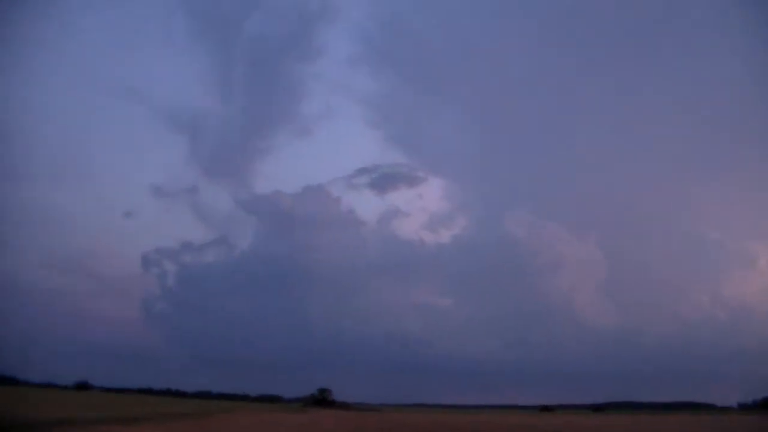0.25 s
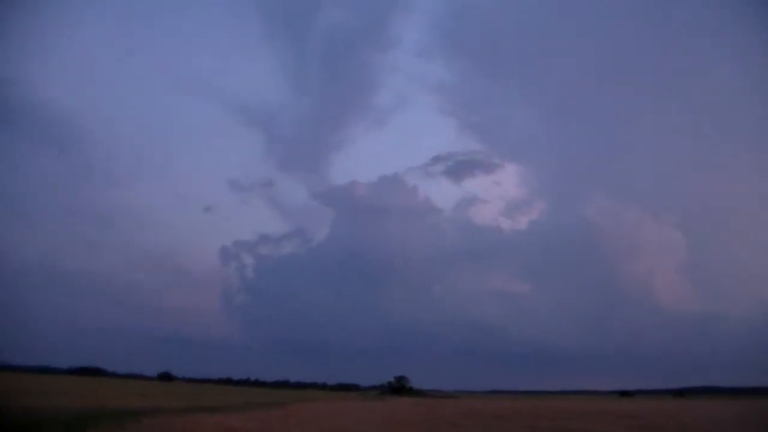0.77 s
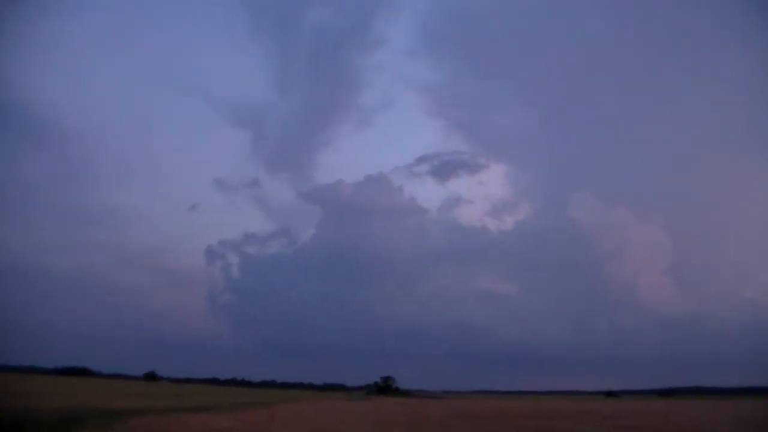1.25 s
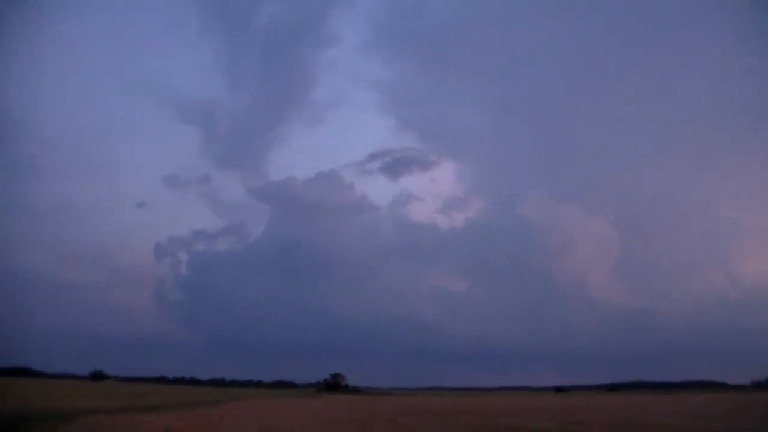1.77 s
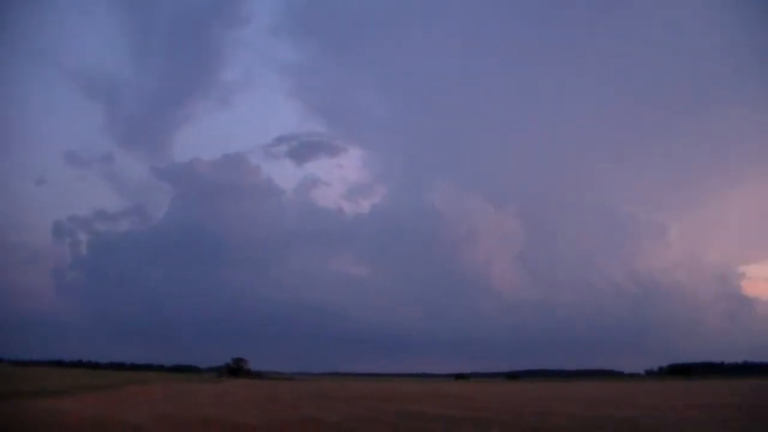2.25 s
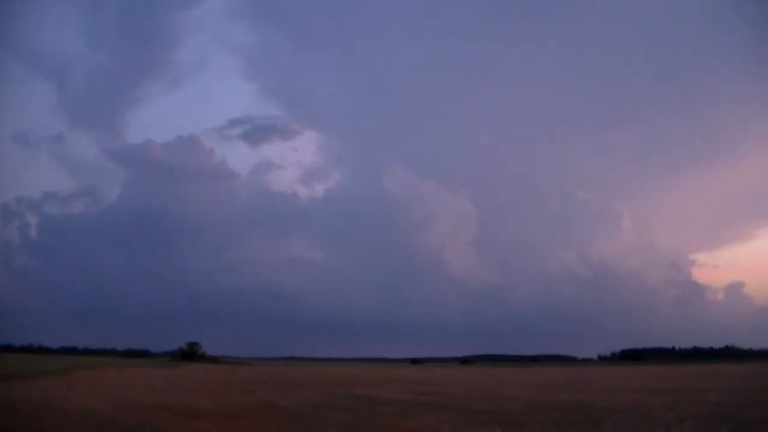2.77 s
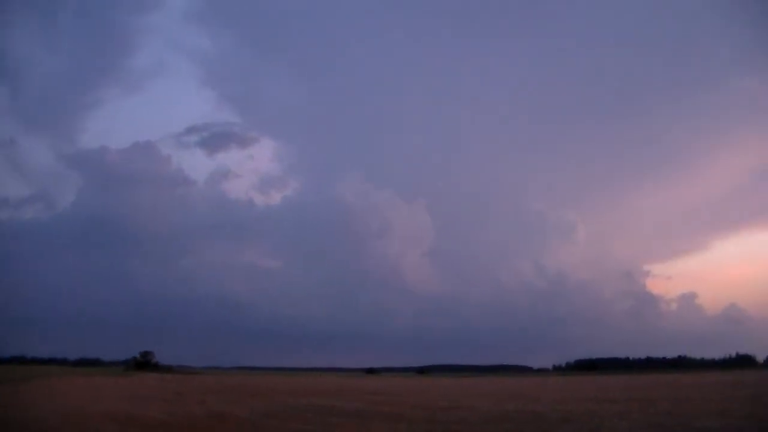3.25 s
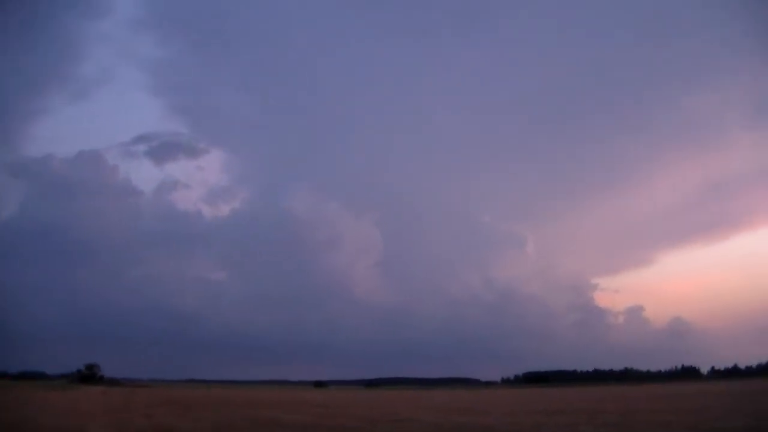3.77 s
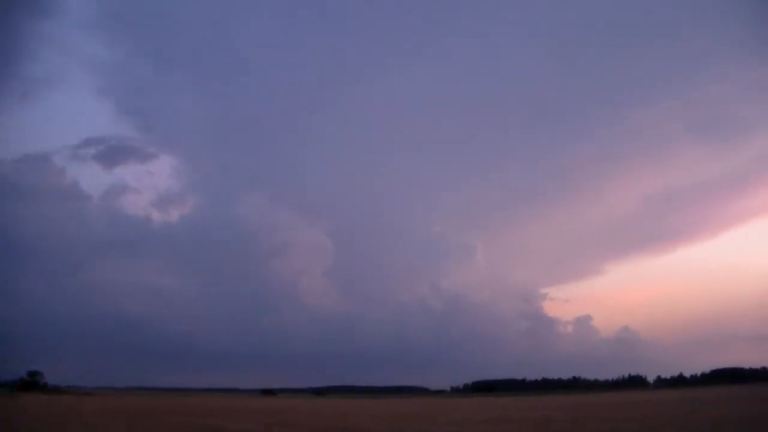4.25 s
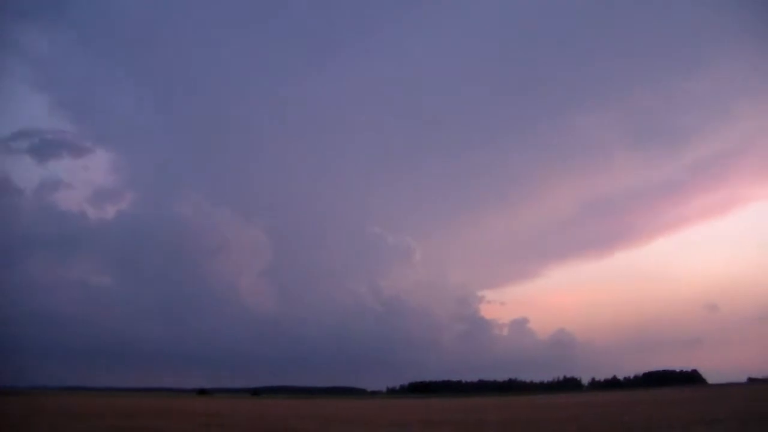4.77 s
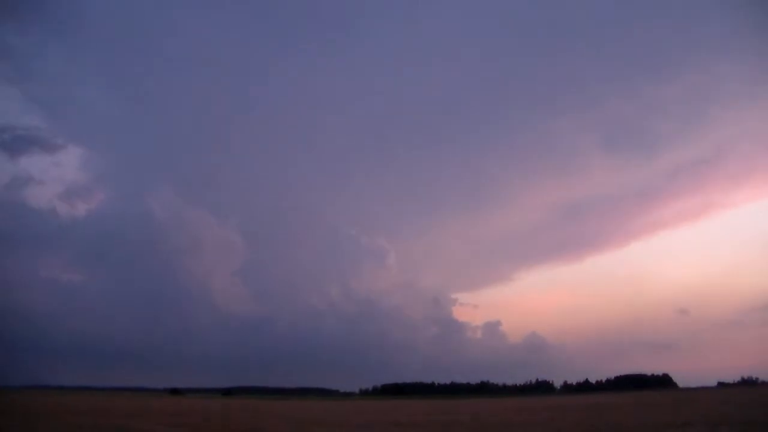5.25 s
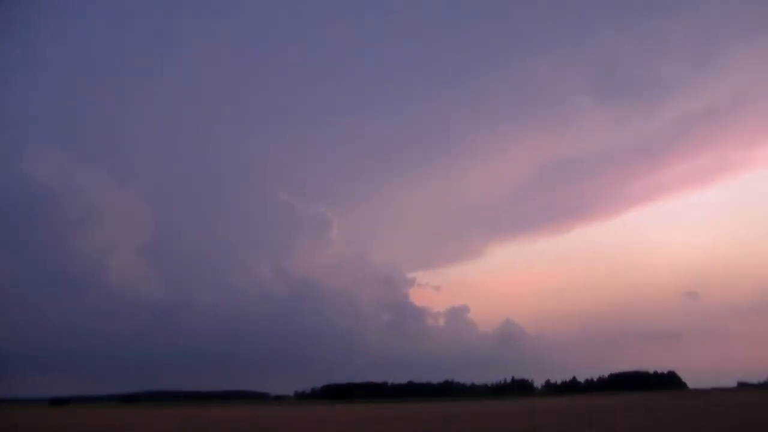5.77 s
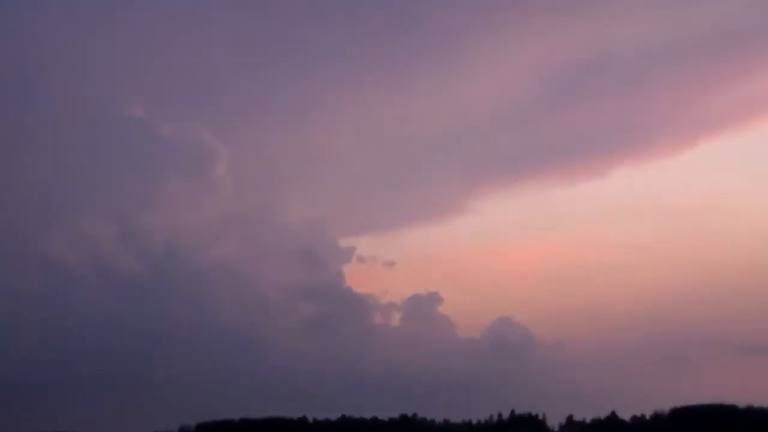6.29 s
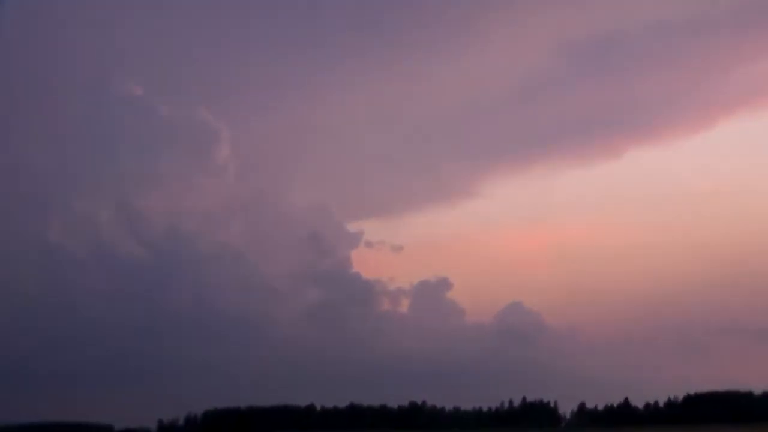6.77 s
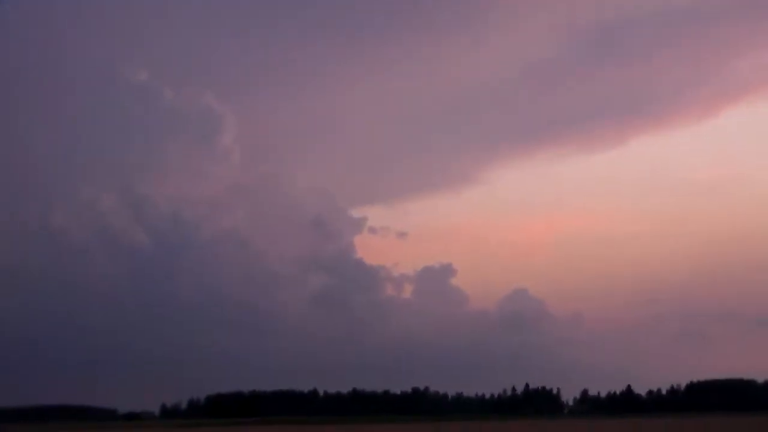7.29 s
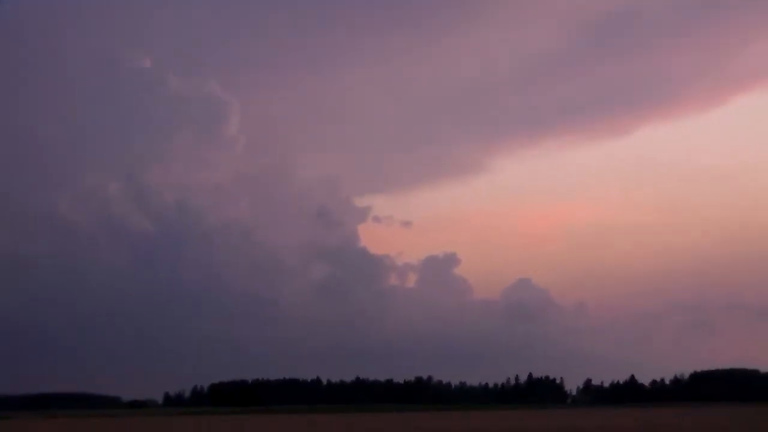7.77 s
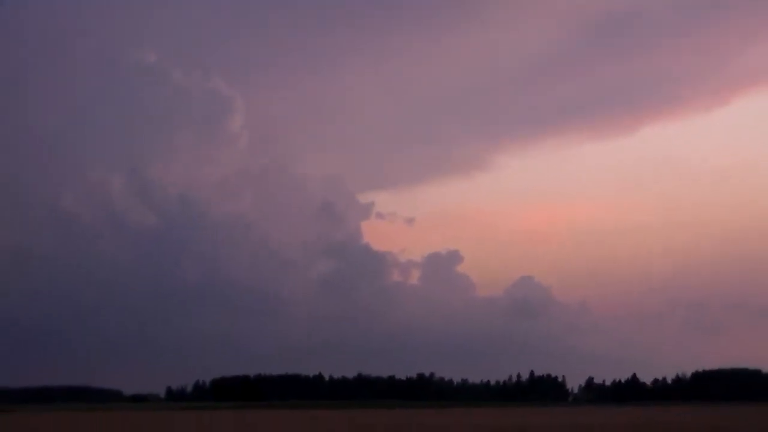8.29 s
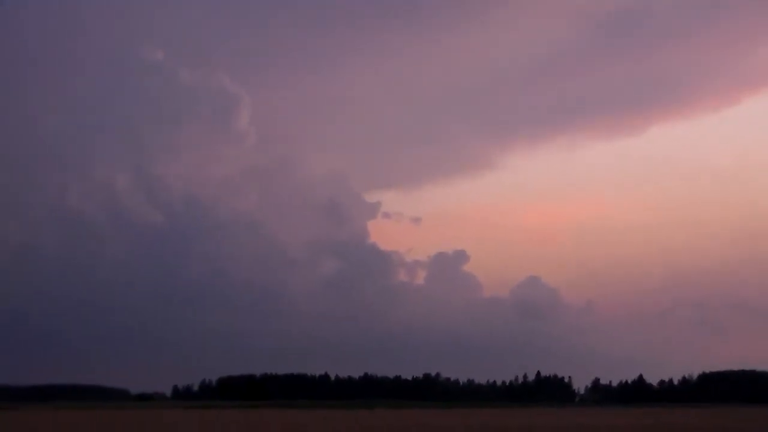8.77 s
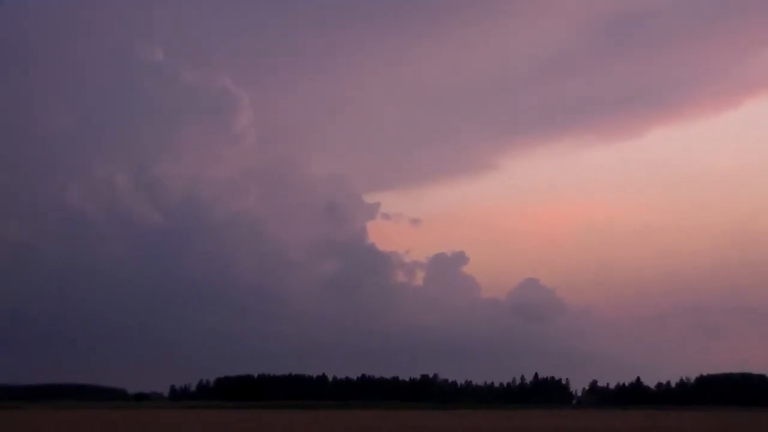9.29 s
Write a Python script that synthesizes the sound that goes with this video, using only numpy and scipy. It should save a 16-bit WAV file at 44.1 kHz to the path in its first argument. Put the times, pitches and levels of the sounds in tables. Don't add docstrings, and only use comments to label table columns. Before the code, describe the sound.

A high, fast-pulsing cricket chorus, faint distant traffic and low wind thumps, interrupted midway by a sharp click and a brief stepping zoom motor.

```python
import sys
import numpy as np
from scipy import signal
from scipy.fft import rfft, irfft, next_fast_len
from scipy.io import wavfile
from scipy.ndimage import uniform_filter1d

SR = 44100
rng = np.random.default_rng(int(sys.argv[2]) if len(sys.argv) > 2 else 0)


def to_wav(sig):
    pcm = np.clip(np.atleast_2d(sig), -1, 1) * 32767
    pcm = np.round(pcm).astype(np.int16)
    wavfile.write(sys.argv[1], SR, pcm.T)


def voltage_ratio(decibels):
    exponent = np.asarray(decibels, float) / 20
    return 10 ** exponent


N = 420273
TIME = np.arange(N) / SR
SIZE = next_fast_len(N)
FREQ = np.arange(SIZE // 2 + 1) * SR / SIZE


def curves(rows):
    s, *columns = np.transpose(rows)
    return [np.interp(TIME, s, c) for c in columns]


def along(points):
    hz, value = np.transpose(points)
    return np.interp(np.log(FREQ + 1), np.log(hz + 1), value)


def unit(x):
    return x / np.sqrt(np.mean(x ** 2))


def colour(x, gain):
    return unit(irfft(rfft(x, SIZE) * gain, SIZE)[:N])


def pan(db):
    return voltage_ratio(np.array([db, -db]) / 2)


def walk(rate_hz):
    k = int(SR / rate_hz)
    held = np.repeat(rng.standard_normal(N // k + 1), k)
    return 1.2 * uniform_filter1d(uniform_filter1d(held, k), k)[:N]


def add(out, s, sound):
    i = int(s * SR)
    out[..., i:i + sound.shape[-1]] += sound


# time in seconds, level in dB.
TRAFFIC_DB = [
    (0, 5.5),
    (1.4, 1.5),
    (3.3, 2),
    (5.6, 0),
    (6, 0.5),
    (7.8, 3),
    (8.5, -.5),
    (9.53, 1.5),
]
# frequency in Hz, level in dB per Hz.
FIELD_SPECTRUM = [(120, -2), (200, -2), (244, -2), (479, -1.5), (536, -2), (617, -0.5), (830, -2),
                  (1100, -0.5), (1180, -3.5), (1910, -9.5), (5800, -13), (7540, -45), (12800, -120)]
# frequency in Hz, left-right correlation.
FIELD_CORRELATION = [(200, 0.41), (400, 0.5), (800, 0.81), (1600, 0.9), (3200, 0.1), (5500, 0.059)]


def field():
    level_db = -54.5 - 2.0
    alike = np.clip(along(FIELD_CORRELATION), -1, 1)
    mid, side = (irfft(rfft(rng.standard_normal(SIZE)) * voltage_ratio(along(FIELD_SPECTRUM)) * np.sqrt(1 + sign * alike),
                       SIZE)[:N] for sign in (1, -1))
    pair = np.array([mid + side, mid - side]) * pan(0.14)[:, None] / np.sqrt(np.mean(mid ** 2))
    return pair * voltage_ratio(level_db + curves(TRAFFIC_DB)[0] + 0.81 * walk(4.13) + 0.94 * walk(13))


# centre in seconds, length in seconds, peak in dB, left minus right in dB.
GUSTS = [(0.368, 0.068, -42, 9), (0.59, 0.19, -52, -5), (1.537, 0.7, -60.5, -1), (2.613, 0.1, -51.5, 15),
         (3.603, .1, -52, -12), (3.96, 0.15, -48, 14.5), (4.273, 0.2, -44, 0.5), (4.448, 0.061, -39, 11),
         (4.613, 0.067, -44.5, 10), (5.17, 0.076, -49.5, 10), (5.36, 0.15, -41, 1), (5.5, 0.12, -53, 10),
         (6.24, 0.22, -39, -4), (6.536, 0.14, -47, -7), (6.675, 0.072, -39, 8), (6.864, 0.11, -47, 7),
         (7.23, 0.35, -42, 11), (7.457, 0.36, -35, 0), (7.777, 0.18, -36.5, 8), (7.987, 0.1, -32.5, 5),
         (8.17, 0.13, -39.5, 17), (8.28, 0.27, -38, 9), (8.573, 0.069, -40.5, 8), (8.85, 0.23, -49, 13),
         (9.094, 0.64, -43.5, 3), (9.385, 0.2, -45.5, 10)]
# frequency in Hz, level in dB per Hz.
RUMBLE_SPECTRUM = [(10, -12), (17, 9), (30, -4.5), (45, 3.5), (60, -36)]
# frequency in Hz, level in dB per Hz.
BUFFET_SPECTRUM = [(26, -23), (45, 0.5), (75, 1.5), (106, -6), (191, -19.5), (301, -31), (400, -35.5),
                   (520, -60), (880, -120)]


def wind():
    calm_db, rumble_db, rumble_follows = -57, -49, 0.56
    centre, length, db, pan_db = np.transpose(GUSTS)[..., None]
    coarse = TIME[::64]
    power = voltage_ratio(2 * db) * np.exp(-(2 * (coarse - centre) / length) ** 2)
    total = power.sum(0) + voltage_ratio(2 * calm_db)
    gust = np.interp(TIME, coarse, np.sqrt(total))
    side_db = np.interp(TIME, coarse, (power * pan_db).sum(0) / total)
    deep = [voltage_ratio(2.2 * walk(4.4)) * colour(rng.standard_normal(N), voltage_ratio(along(RUMBLE_SPECTRUM))) for _ in range(2)]
    buffet = [unit(voltage_ratio(2.03 * walk(22)) * colour(rng.standard_normal(N), voltage_ratio(along(BUFFET_SPECTRUM))))
              for _ in range(2)]
    rumble_gain = voltage_ratio(rumble_db) * (gust / voltage_ratio(calm_db)) ** rumble_follows
    out = np.array(deep) * rumble_gain * pan(1.5)[:, None] + np.array(buffet) * gust * pan(side_db)
    return signal.sosfilt(signal.butter(4, 400, fs=SR, output="sos"), out)


# time in seconds, peak in dB, width in ms, push +1 or pull -1.
WINDWARD_EDDIES = [(4.2002, -30, 4.5, -1), (4.2838, -33, 3.3, -1), (4.3082, -34, 6.1, 1),
                   (4.3391, -30, 5.9, -1), (4.4389, -26.5, 3.9, -1), (4.4611, -25, 1.42, -1),
                   (4.488, -38, 2.6, 1), (5.5055, -32.5, 4.7, -1), (6.5516, -25.5, 4.9, 1),
                   (6.86, -27, 5.5, -1), (7.1469, -27, 3.4, 1), (7.259, -24.5, 2.26, 1),
                   (7.2868, -21.5, 3.6, 1), (7.3362, -24, 4.2, -1), (7.3812, -23.5, 2.6, 1),
                   (7.5643, -25.5, 3.5, -1), (7.7512, -25.5, 2.66, 1), (7.7935, -23.5, 2.43, 1),
                   (7.8415, -30, 6.8, -1), (7.9224, -35, 12, 1), (7.9473, -27, 3.4, -1),
                   (7.9733, -21.5, 2.4, -1), (8.004, -17.5, 4.8, -1), (8.171, -25, 4, 1),
                   (8.1976, -30, 11, 1), (8.3865, -22.5, 4.2, -1)]
# time in seconds, peak in dB, width in ms, push +1 or pull -1.
SHELTERED_EDDIES = [
    (4.356, -29.5, 4.1, -1),
    (4.48, -35, 4.5, -1),
    (7.3463, -36, 5.9, -1),
    (7.3868, -27, 3.7, -1),
    (7.4406, -23, 4.7, 1),
    (7.4627, -29.5, 2.2, -1),
    (7.777, -24, 6.3, -1),
    (8.0129, -32, 5, -1),
]


def eddies():
    out = np.zeros((2, N))
    half = SR // 20
    for port, bursts in enumerate((WINDWARD_EDDIES, SHELTERED_EDDIES)):
        for s, db, ms, push in bursts:
            u = np.arange(-half, half) / SR / (ms / 1300)
            lump = (1 - u ** 2) * np.exp(-u ** 2 / 2)
            add(out[port], s - half / SR, np.sign(push) * voltage_ratio(db + 3.0) * lump)
    return out


def ring(modes, push_ms):
    t = np.arange(SR // 20) / SR
    y = sum(voltage_ratio(db) * np.sin(2 * np.pi * hz * t) * np.exp(-np.log(1000) * t / t60) for hz, db, t60 in modes)
    y = y * (1 - np.exp(-t * 1000 / push_ms))
    return y / np.abs(y).max()


def hit(out, s, db, modes, push_ms, spread):
    modes = 3 * list(modes)
    nudges = rng.standard_normal((2, len(modes), 2))
    mid, side = (ring([(hz * (1 + spread * a), g + b, t60) for (hz, g, t60), (a, b) in zip(modes, nudge)], push_ms)
                 for nudge in nudges)
    add(out, s, voltage_ratio(db) * (mid + voltage_ratio(-9) * side * np.array([[1], [-1]])))


# time in seconds, peak in dB, ring in Hz.
CASING_TICKS = [(0.135, -52.5, 2490), (0.395, -57, 1650), (0.4223, -55, 1800), (0.4582, -53.5, 1840),
                (0.6392, -56, 1600), (2.616, -56, 2800), (5.5235, -51, 2400), (6.575, -52, 4080),
                (6.7748, -58, 2590), (8.2153, -51, 2300), (9.015, -52.5, 2800)]


def casing_ticks(out):
    for s, db, hz in CASING_TICKS:
        modes = [(hz, 0, .007), (0.655 * hz, -2, .006),
                 (min(1.14 * hz, 4400), -3, .006), (min(1.39 * hz, 5000), -8, .005)]
        hit(out, s, db + 18.5, modes, 0.54, 0.19)


# frequency in Hz, level in dB, t60 in seconds.
PRESS_MODES = [(1050, -12, 0.03), (1600, -4, 0.014), (2000, -1, .014), (2250, 6, 0.022), (2700, 3, 0.018),
               (3140, -2, .014), (4800, -10, .008), (5922, -11, .006)]
# time in seconds, peak in dB, push in ms.
SNAP_HITS = [
    (5.640, -32, .8),
    (5.6440, -15, .1),
    (5.6448, -15, .2),
    (5.6455, -3, .06),
    (5.6463, -11, .1),
    (5.6475, -17, .3),
    (5.6490, -17, .5),
    (5.6511, -17, .5),
    (5.6535, -22, .5),
]
# frequency in Hz, level in dB, t60 in seconds.
SWITCH_MODES = [(1400, -22, 0.013), (2190, -10, 0.0099), (3120, 2, 0.011), (4200, 2, 0.008),
                (5200, 0, 0.005), (6370, 4, 0.006), (7400, 0, 0.005), (9000, 3, 0.006), (10300, 1, 0.004),
                (12500, -3, .002)]


def switch(out):
    hit(out, 5.5729, -13.5, PRESS_MODES, 0.1, 0.05)
    for s, db, push_ms in SNAP_HITS:
        hit(out, s, db, SWITCH_MODES, push_ms, 0.06)


MOTOR_S, STOP_S = 5.6965, 6.497
# frequency in Hz, level in dB, t60 in seconds.
BARREL_MODES = [(1114, 5, 0.031), (996, -0.5, 0.031)]
# frequency in Hz, level in dB, t60 in seconds.
GEAR_MODES = [(1660, 0, 0.013), (2140, -4, 0.017), (2800, -2, 0.017), (3390, -2, 0.019), (3880, -13, 0.011)]


def lens_motor(out):
    step_s, step_count, step_scatter_db = .03714, 22, .7
    jerk_db, slack_db, loaded_db, stop_db = -37, -51, -31, -29
    load_from_s, load_to_s = 5.83, 6.23
    gear_db, soft_teeth_s, soft_db = -3, (6.253, 6.365), -14
    slip_s, slip_db = 6.4, -8
    times = np.append(MOTOR_S + step_s * np.arange(step_count), STOP_S)
    load_db = np.interp(times, [load_from_s, load_to_s], [slack_db, loaded_db])
    load_db = load_db + step_scatter_db * rng.standard_normal(len(times))
    for s, db in zip(times, [jerk_db, *load_db[1:-1], stop_db]):
        slips = abs(s - slip_s) < step_s / 2
        soft = any(abs(s - tooth) < step_s / 2 for tooth in soft_teeth_s)
        hit(out, s, db + slip_db * slips, BARREL_MODES, 1.8, 0.0094)
        hit(out, s, db + gear_db + soft_db * soft, GEAR_MODES, 0.27, 0.074)


def motor_whirr():
    whirr_db, scrape_db, scrape_s = -55, -40.5, .006
    spectrum = [(500, -12.5), (1000, -8), (1400, -16), (3800, -11), (5000, -23), (9000, -70)]  # Hz, dB
    running = (TIME > MOTOR_S) * (TIME < STOP_S + scrape_s)
    scrape = np.exp(-((TIME - STOP_S - .009) / scrape_s) ** 2)
    noise = colour(rng.standard_normal(N), voltage_ratio(along(spectrum)))
    return noise * (voltage_ratio(whirr_db) * running + voltage_ratio(scrape_db) * scrape)


def camera():
    out = np.zeros((2, N))
    casing_ticks(out)
    switch(out)
    lens_motor(out)
    out = signal.sosfilt(signal.butter(2, 600, "high", fs=SR, output="sos"), out)
    return out + motor_whirr()


def stroke_shape(turns):
    lean_rad = -0.39
    angle = 2 * np.pi * turns
    return np.cos(angle + lean_rad * (np.cos(angle) - 1))


def teeth(rate_hz, scatter_db):
    moment, size, sign = rng.random(N), rng.exponential(size=N), rng.standard_normal(N)
    return unit((moment < rate_hz / SR) * voltage_ratio(scatter_db * size) * np.sign(sign))


# time in seconds, lags of first and second in wing strokes.
SINGER_LAGS = [(0.0, 0.33, 1.13), (0.66, -0.27, 0.65), (1.3, -0.11, 0.49), (1.8, -0.55, 0.57),
               (2.09, -0.55, 0.12), (2.98, -0.64, 0.2), (3.54, -1.05, -0.43), (3.81, -0.8, -0.45),
               (4.45, -0.43, -0.36), (5.02, -0.67, -0.42), (5.62, -0.55, -0.57), (6.03, -0.81, -0.78),
               (6.55, -0.8, -0.42), (7.15, -1.15, -1.0), (7.81, -1.22, -0.53), (8.47, -1.44, -0.75),
               (9.2, -1.71, -1.03), (9.53, -1.71, -1.06)]
WING_PEAKS_HZ = (7940, 10950)
# time in seconds, level in dB, left minus right in dB.
CHORUS_LEVEL = [(0, -31.3, 1), (.7, -28.5, .4), (1.6, -27.5, .5), (2.25, -29.5, 1.3), (3, -28, 0.7),
                (3.45, -30, 1.3), (4.25, -28.5, 0.7), (4.5, -29.5, .9), (5.6, -29.5, .4), (6.4, -29, 0),
                (7.6, -30, 1.1), (8.8, -29.5, 0.6), (9.53, -30.5, 0)]
# frequency in Hz, level in dB per
# Hz.
CHORUS_SPECTRUM = [(4500, -27.5), (5600, -21), (6550, -20.5), (7370, -1.5), (8360, 2), (10100, -1.5),
                   (11500, -8), (13600, -17), (14250, -15.5), (14400, -104)]
# frequency in Hz, phase in radians.
PORT_LEAD = [(0, 5.5), (4650, -20.5), (5250, 16), (5680, -16), (5940, 5), (7670, 2.5), (8180, 3), (9300, 3),
             (13500, 4), (14100, -12), (14400, 18), (15100, 4)]
# frequency in Hz, level in dB.
SCATTER_SPECTRUM = [(5500, -29), (6500, 5), (7300, -2.5), (10000, 1), (14000, 5)]


def crickets():
    stroke_hz = 22.8
    level_db, pan_db = curves(CHORUS_LEVEL)
    strokes = [np.exp(0.45 * (stroke_shape(stroke_hz * TIME - lag) - 1)) * voltage_ratio(0.83 * walk(22))
               for lag in curves(SINGER_LAGS)]
    peaks = [1 / np.sqrt(1 + ((FREQ - hz) / 5000) ** 2) for hz in WING_PEAKS_HZ]
    waves = []
    for _ in range(3):
        near = sum(colour(stroke * teeth(3000., 1.04), peak) for stroke, peak in zip(strokes, peaks))
        far = voltage_ratio(0.27 * walk(15)) * rng.standard_normal(N)
        waves.append(unit(near) + voltage_ratio(-2) * far)
    wing, lead = voltage_ratio(along(CHORUS_SPECTRUM)), np.exp(.5j * along(PORT_LEAD))
    direct = np.array([colour(waves[0], wing * lead), colour(waves[0], wing / lead)])
    scattered = rfft([colour(w, wing) for w in waves[1:]], SIZE) * voltage_ratio(along(SCATTER_SPECTRUM))
    scattered = irfft(scattered, SIZE)[:, :N]
    return unit(direct + scattered) * voltage_ratio(level_db - 0.62) * pan(pan_db)


def scene():
    return field() + wind() + eddies() + camera() + crickets()


def gain_control():
    duck_s, attack_s, hold_s, recover_s = 5.647, .011, 0.42, 0.21
    duck_db, hold_db, rest_db = -15, -13.5, -5
    times = duck_s + np.cumsum([0, attack_s, hold_s, recover_s])
    return voltage_ratio(np.interp(TIME, times, [0, duck_db, hold_db, rest_db]))


def top_cut(x):
    return signal.sosfilt(signal.butter(12, 15530, fs=SR, output="sos"), x)


def record(dry):
    return top_cut(dry * gain_control())


dry = scene()
out = record(dry)
to_wav(out)
```